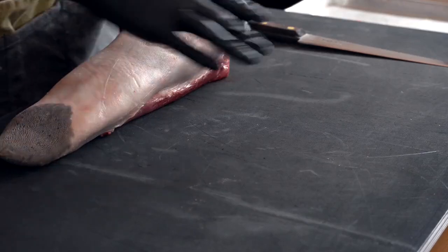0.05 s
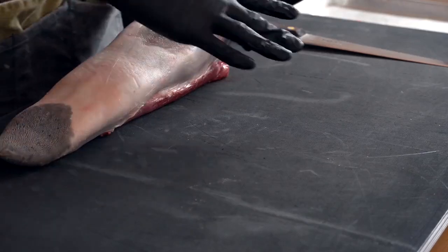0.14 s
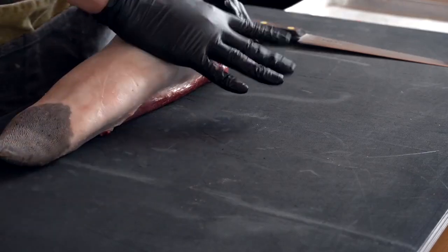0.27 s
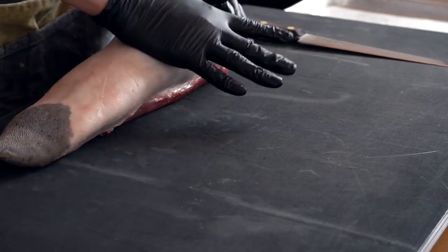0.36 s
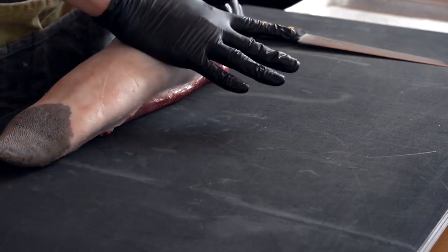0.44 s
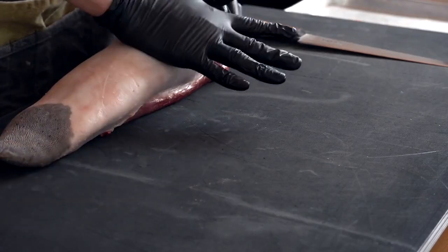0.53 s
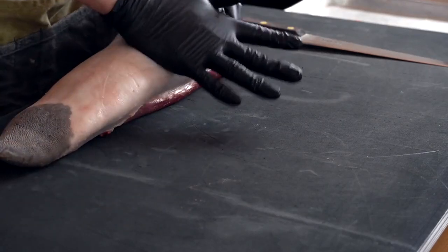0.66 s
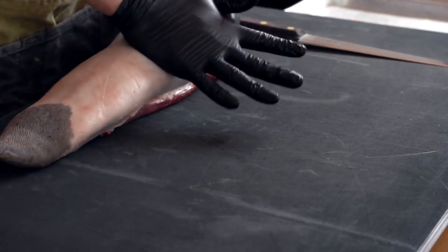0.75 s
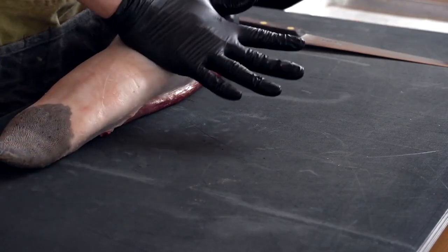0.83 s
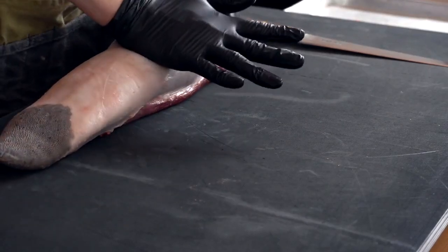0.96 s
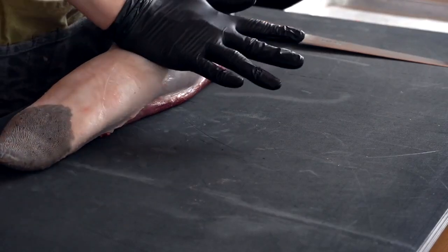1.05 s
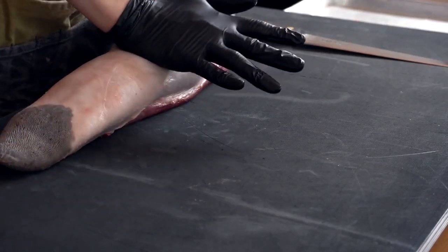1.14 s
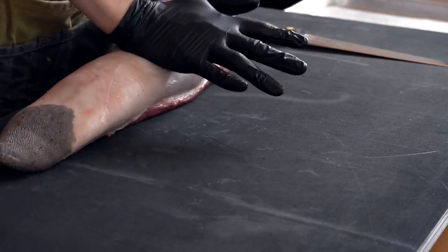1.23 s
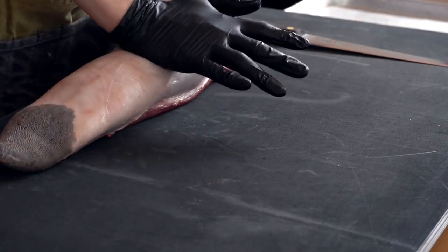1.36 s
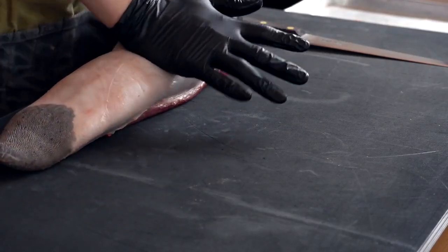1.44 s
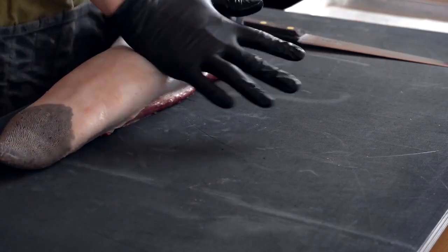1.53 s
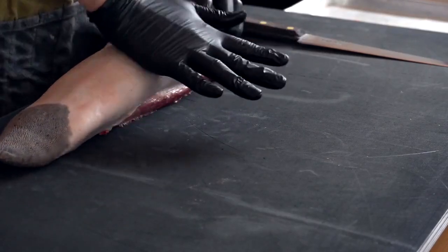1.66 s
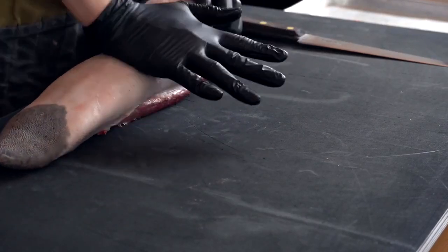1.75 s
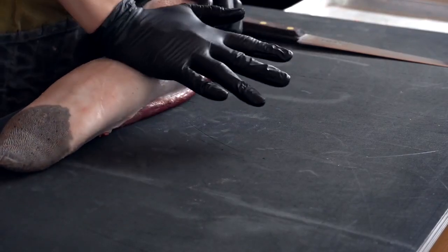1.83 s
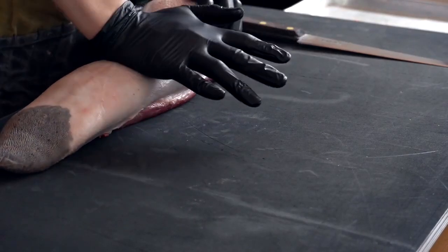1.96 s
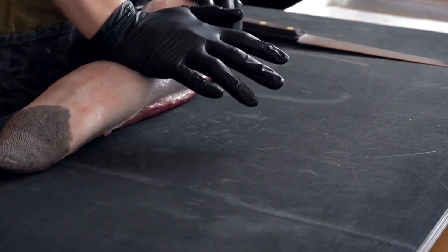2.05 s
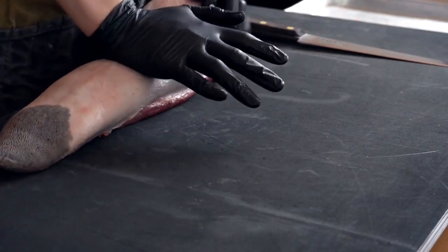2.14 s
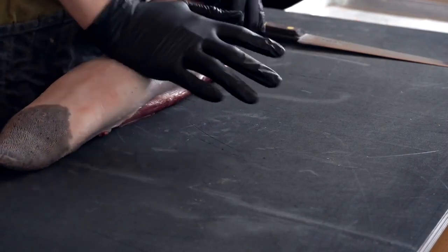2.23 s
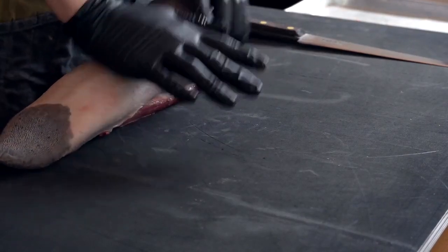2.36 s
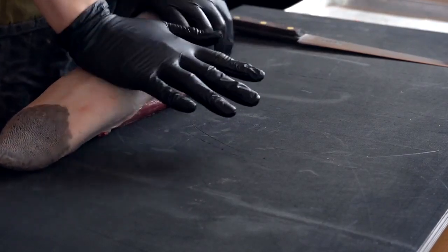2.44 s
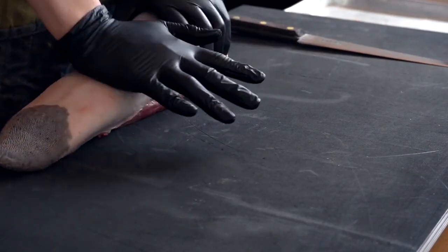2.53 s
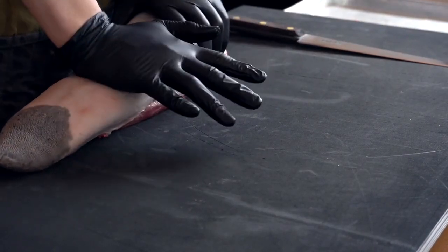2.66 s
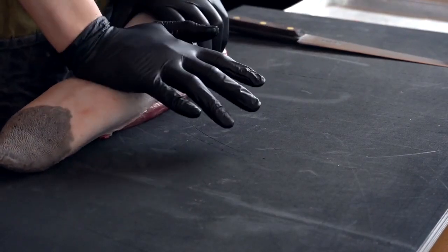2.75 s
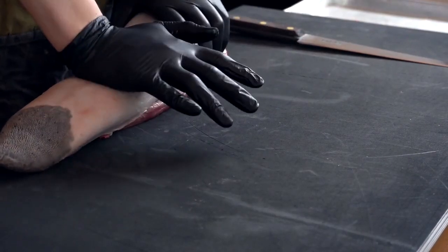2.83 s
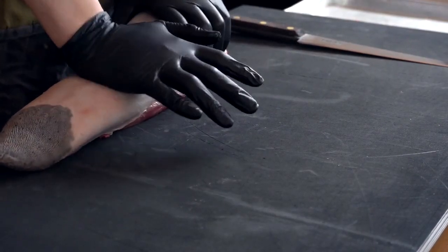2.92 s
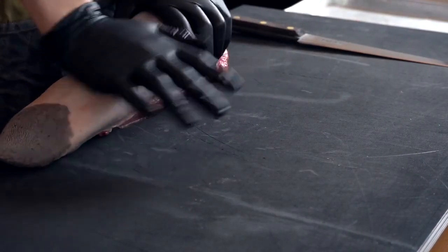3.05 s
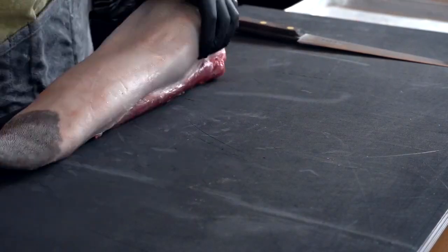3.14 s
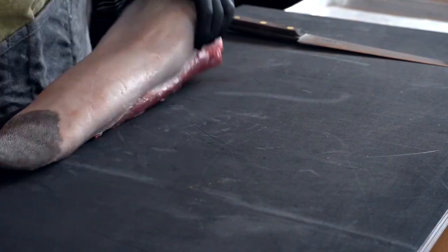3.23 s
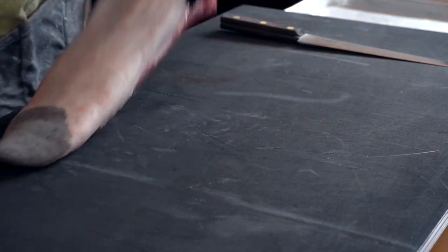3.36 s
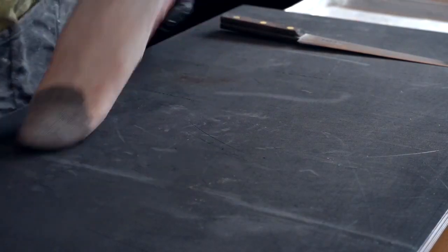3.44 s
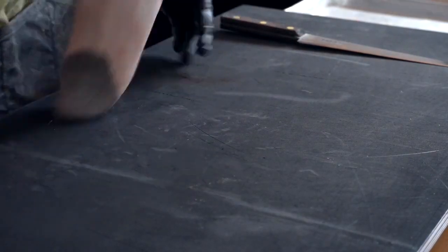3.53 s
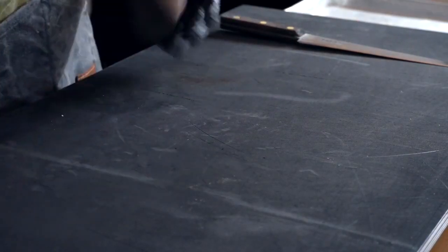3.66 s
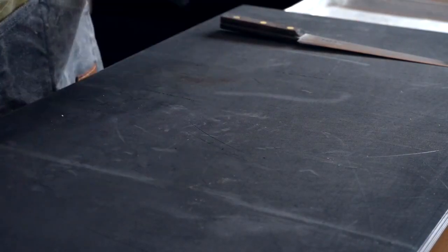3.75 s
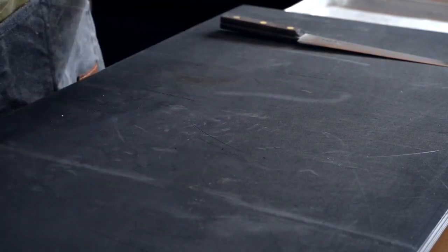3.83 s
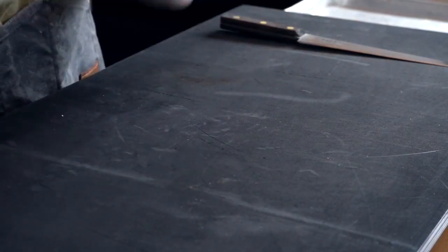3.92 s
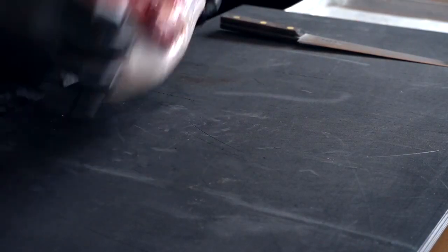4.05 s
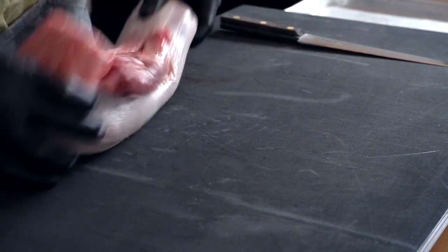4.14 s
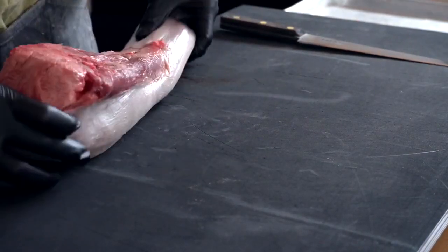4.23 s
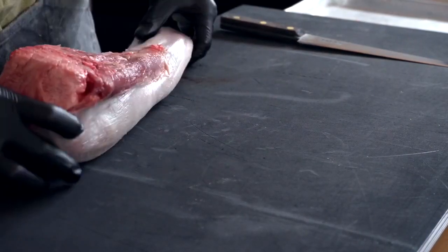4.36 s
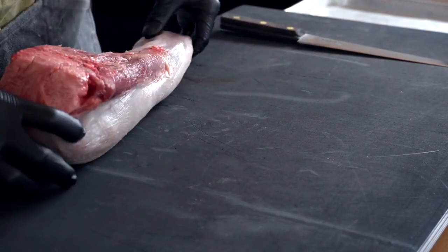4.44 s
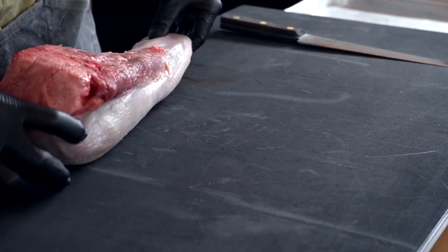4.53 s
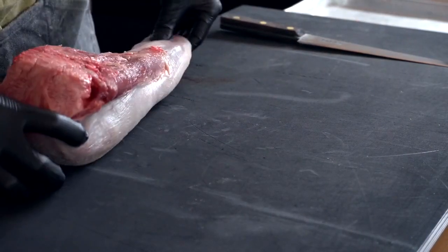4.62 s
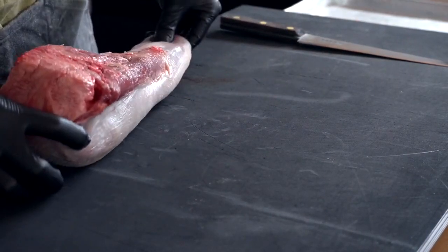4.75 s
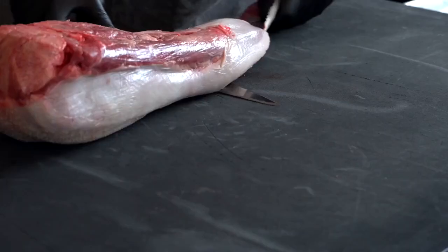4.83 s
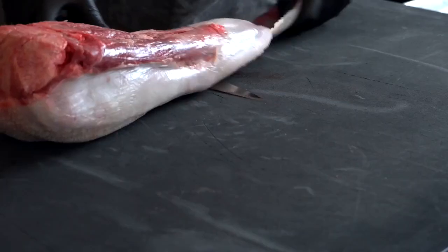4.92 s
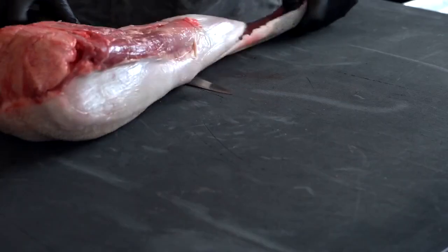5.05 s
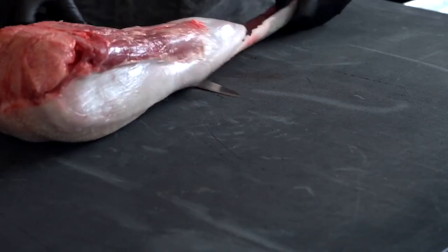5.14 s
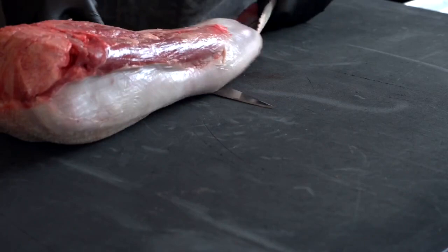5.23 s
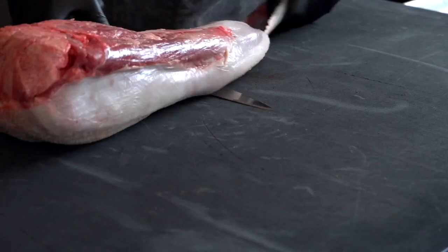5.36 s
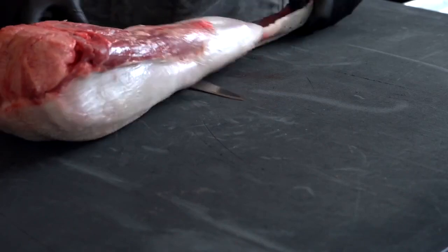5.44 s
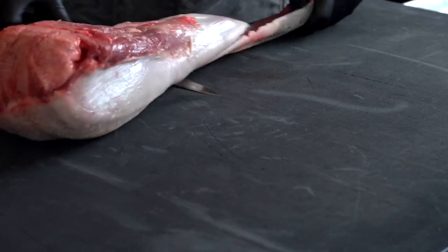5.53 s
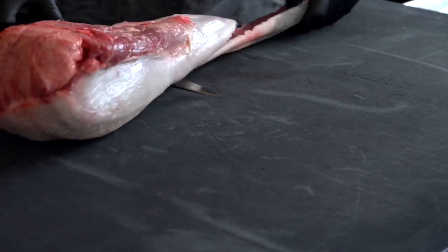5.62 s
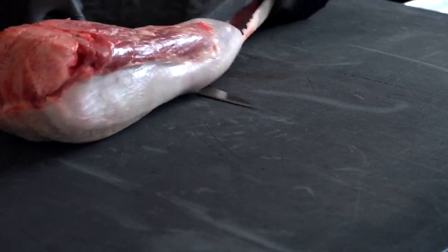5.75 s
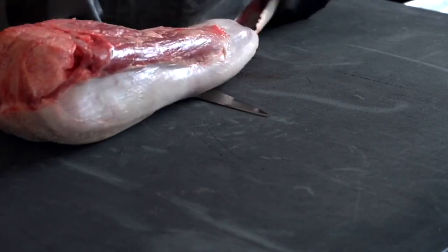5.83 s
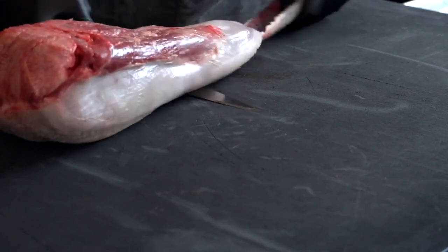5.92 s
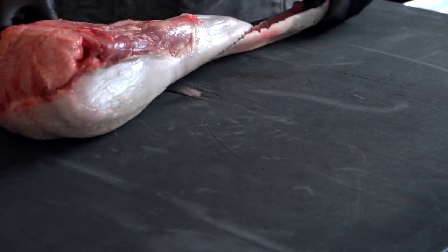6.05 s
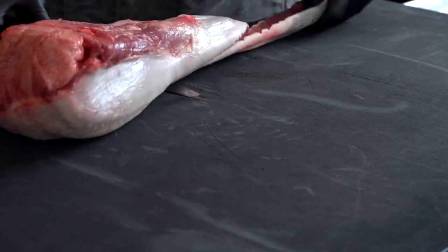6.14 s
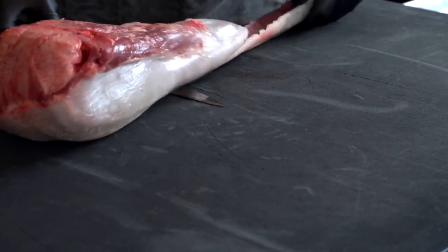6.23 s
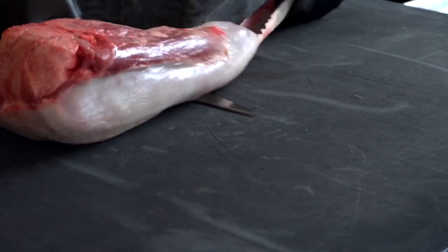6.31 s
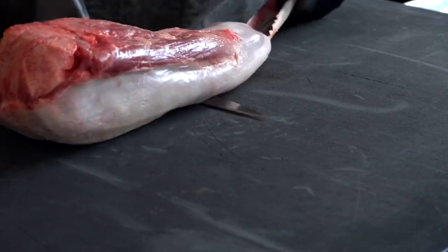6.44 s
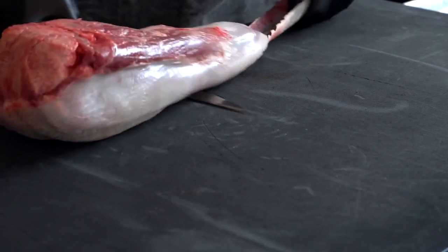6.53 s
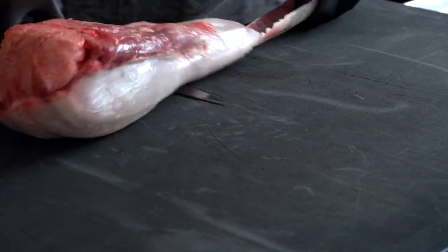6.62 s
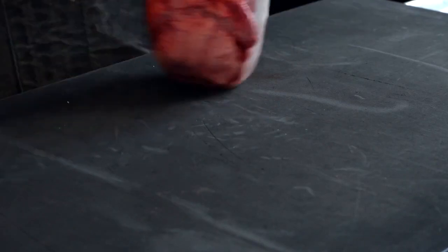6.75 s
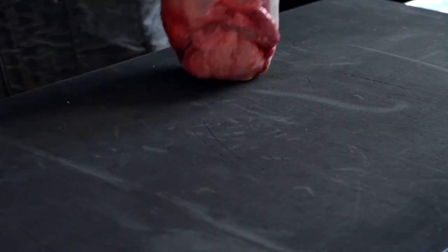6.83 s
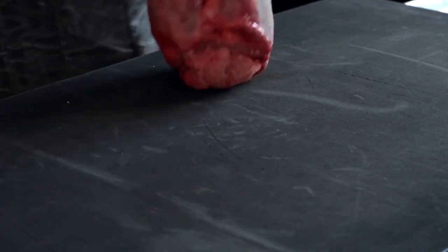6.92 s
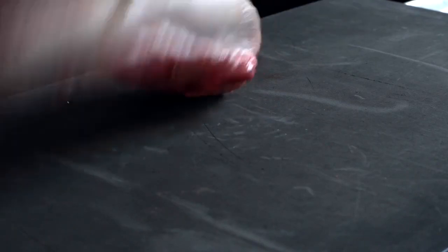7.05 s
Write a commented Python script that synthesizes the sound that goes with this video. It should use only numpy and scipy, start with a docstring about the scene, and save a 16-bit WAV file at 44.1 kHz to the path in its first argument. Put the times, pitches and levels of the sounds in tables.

```python
"""Gloved hands press, slap and lift a wet fillet on a plastic board, then a knife saws between skin and flesh.
Wet bursts and rustles are grainy noise in bands, sticky ticks are short rings; pops, hollow knocks and squeaks
are short tones that glide in pitch. Blows ring the damped modes of a worktop; knife strokes are noise shaped
into groan, rasp and hiss. A small quiet kitchen rumbles and hisses behind. Three times the level drops suddenly
and climbs back, the last time only in part. Two close microphone ports: the left hears the board a little earlier."""
import sys
import numpy as np
from scipy import signal
from scipy.fft import rfft, irfft, next_fast_len
from scipy.io import wavfile
from scipy.ndimage import uniform_filter1d, map_coordinates

SR = 44100
rng = np.random.default_rng(int(sys.argv[2]) if len(sys.argv) > 2 else 0)


def master(y):
    """Save y as 16-bit WAV."""
    cut = np.clip(np.atleast_2d(y).T, -1, 1)
    pcm = np.round(cut * 32767)  # scale
    wavfile.write(sys.argv[1], SR, pcm.astype(np.int16))


N = 312251

# spectrum of the kitchen rumble: (frequency [Hz], relative level [dB])
RUMBLE_SPECTRUM = [(15, -56.5), (25, -21.5), (97, 6.5), (384, -5.5), (607, -10.5), (988, -18), (1440, -18),
                   (4140, -25), (6560, -27.5), (7510, -29), (13600, -25), (16000, -37.5)]
# loudness of the rumble: (time [s], level [dB])
RUMBLE_LEVEL = [(0, -63), (.9, -60.5), (1.3, -63.5), (3.3, -63.5), (4.1, -63.5), (4.7, -65), (7.08, -61.5)]
# spectrum of a thinner room tone, faint hiss near 4 kHz: (frequency [Hz], relative level [dB])
ROOM_TONE_SPECTRUM = [(15, -47.5), (25, -11.5), (114, -1), (293, -13.5), (3160, -27.5), (4030, -5.5),
                      (4740, -13), (7510, -13.5), (16000, -26.5)]
# loudness of the room tone: (time [s], level [dB])
ROOM_TONE_LEVEL = [(0, -68), (2.1, -82), (4.7, -78.5), (6.7, -73), (6.715, -87.5), (6.745, -72),
                   (6.85, -80), (7.08, -66.5)]
# rustling noise, rubbing gloves and the fading end of a slip: (start [s], length [s],
#   middle band at start [dB], middle band at end [dB], low band re middle [dB], high band re middle [dB])
RUSTLES = [(0, .1, -78, -65.5, -7, 17), (0.111, 0.042, -49.5, -47, -19, 8.5),
           (0.257, 0.035, -49, -40.5, -11.5, 4), (0.385, 0.36, -66.5, -53, -20, -1),
           (0.772, 0.2, -60.5, -70.5, -18, -6), (1.631, 0.068, -42, -67, -26.5, -10),
           (1.713, 0.048, -70.5, -83, 0, 9.5), (2.561, 0.15, -81, -77.5, -2.5, -1),
           (3.08, 0.068, -49, -54, 3, 7.5), (3.18, 0.11, -50.5, -48.5, -16.5, 13.5),
           (3.309, 0.084, -62, -51, -5, 11), (3.462, 0.14, -58.5, -52.5, -10.5, 9),
           (3.615, 0.14, -55, -78, -27, -9), (3.77, 0.014, -67, -71.5, -22.5, -2),
           (3.948, 0.18, -73.5, -65.5, -4, 8.5), (4.239, 0.047, -50, -65, -14, 4),
           (4.318, 0.074, -56.5, -75.5, -2, 11.5), (4.42, 0.081, -65, -65, -24, 5)]
# sticky ticks of the gloves: (time [s], level [dB], frequency [Hz])
TICKS = [(0.1115, -14.5, 7400), (0.1507, -18, 7400), (0.2013, -31, 6120), (0.2477, -24.5, 8650),
         (0.2713, -12, 10600), (0.2976, -19.5, 4800), (.383, -37, 10800), (0.645, -47, 4560),
         (.6957, -35, 4660), (0.7515, -29, 4530), (1.2887, -55, 3500), (1.4424, -35, 4770),
         (1.848, -35, 14300), (3.3853, -18, 10300), (3.6145, -29, 3620), (3.6983, -22, 13000),
         (3.7732, -40.5, 5550), (1.938, -50, 6500), (4.0902, -46.5, 4100), (4.0915, -47.5, 2270),
         (4.17, -27.5, 3280), (4.203, -35, 2030), (4.1705, -34, 7800), (4.3025, -23, 9500),
         (4.310, -30, 9000), (4.4198, -23.5, 8200), (4.4200, -24, 11000), (4.579, -58.5, 2160)]
# wet noise bursts, glove slips and soft noise around some pops: (time of peak [s], e-fold rise [s], hold [s],
#   T60 before the band share [s], crackle level [dB], strongest frequency [Hz], fall below it [dB/octave],
#   fall above it [dB/octave], level of the lowest band [dB])
WET_BURSTS = [(.257, 0.0047, 0.016, 0.15, -45, 3000, 37, 12, -52.5),
              (0.949, .0036, 0.036, 0.28, -43, 5000, 12, 4, -41),
              (.960, 0.003, 0.021, 0.33, -29, 1430, 1.5, 8.7, -35.5),
              (1.042, 0.029, 0.007, 0.41, -40.5, 1400, 2.7, 8.2, -50),
              (1.486, 0.011, .017, .11, -38.5, 8900, 17.3, 2, -68),
              (1.519, 0.0066, 0.012, 0.34, -24, 3330, 48, 3, -41),
              (2.184, 0.0076, 0.023, .9, -35.5, 6700, 14.6, 1.1, -62.5),
              (2.25, 0.0052, .017, 0.25, -23, 3290, 15, 3.5, -33.5),
              (2.429, 0.0077, 0.017, 0.16, -42, 4640, 21, 3, -51.5),
              (3.034, 0.013, 0.0034, .4, -36, 4190, 37, 3.3, -53.5),
              (3.04, 0.0017, 0.0036, 0.084, -29.5, 2340, 75, 21, -42.5),
              (3.386, 0.03, 0.014, 0.27, -57, 7960, 9.1, 2.2, -48.5),
              (3.61, 0.03, 0.0045, 0.18, -45.5, 5000, 30, 2, -54.5),
              (4.168, .001, 0.047, 0.27, -56.5, 2400, 16, 1.13, -39.5),
              (4.302, 0.0014, .008, 0.17, -38, 8600, 25, 3, -55.5),
              (4.417, .0025, .0034, 0.53, -46, 8550, 24, 3, -65)]
# bands of the wet crackle: (low edge [Hz], high edge [Hz])
WET_BANDS = [(380, 900), (900, 1320), (1380, 1930), (1930, 2950), (2950, 5500), (5500, 9000), (9000, 13500)]
# decay in each wet band: (share of the burst's T60 [1])
WET_DECAY_SHARE = [0.76, 0.39, 0.47, 0.62, 0.73, 0.61, 0.69]
# short tones that glide in pitch, as pops, hollow knocks and squeaks: (start [s], level [dB],
#   start frequency [Hz], end frequency [Hz], length [s])
GLIDING_TONES = [(0.261, -36, 608, 646, 0.012), (.912, -31.5, 497, 507, 0.014),
                 (1.491, -35.5, 510, 530, 0.0066), (1.531, -29, 796, 604, 0.022),
                 (2.176, -31.5, 2650, 2650, 0.043), (2.206, -31.5, 373, 354, 0.017),
                 (2.258, -19.5, 575, 546, 0.017), (2.425, -43.5, 2050, 2100, 0.076),
                 (3.038, -47.5, 790, 598, 0.019), (3.331, -43, 736, 740, .013),
                 (3.332, -40, 338, 353, 0.054), (3.344, -37.5, 1970, 1890, 0.012),
                 (3.367, -31, 514, 1060, 0.057), (3.597, -34, 372, 324, 0.067),
                 (4.166, -17, 382, 339, 0.029), (4.204, -17, 347, 336, 0.017)]
# weight lands on the worktop: (start [s], level [dB], modes above 200 Hz re lower ones, before UPPER_MODES_DB [dB])
THUMPS = [(.307, -32, -16), (0.385, -45, -15), (.925, -43, 1.5), (.964, -30.5, 1), (1.529, -49, 7),
          (1.6, -47.5, -15), (2.249, -45.5, 9.5), (2.32, -37, -23), (2.468, -34.5, -11.5),
          (2.773, -54, -6.5), (3.085, -38, -6), (3.293, -42, -11.5), (3.345, -39.5, -19),
          (3.385, -39.5, -23), (3.621, -48.5, 7), (4.168, -20.5, 1), (4.196, -14.5, -5.5),
          (4.217, -15, -12), (4.79, -49, -2), (5.045, -42.5, -9.5), (5.22, -50, -3), (5.331, -42.5, -7),
          (5.541, -46, -23), (5.591, -39.5, -19), (5.766, -41.5, 3), (6.087, -44, -14), (6.298, -47, -10)]
# worktop modes: (frequency [Hz], relative level [dB], T60 of the main ring [s], weight at the left port [1],
#   weight at the right port [1]); unlike signs swing opposite
WORKTOP_MODES = [(25.1, -17.5, 0.88, 0.72, .9), (65, -0.5, 0.33, 1, 1), (76.8, 1, 0.18, 0.95, 1),
                 (102.8, -5, 0.34, 0.53, 0.99), (142.7, -12, 0.36, -1.4, 0.84),
                 (173, -16.5, 0.41, 0.65, -0.63), (227.8, -14, .2, 1, 1), (288, -14, 0.19, 0.57, 0.83),
                 (320.7, -9, 0.17, 0.98, 0.73), (340, -14, 0.16, .9, .9), (464, -14.5, 0.15, 0.46, .9),
                 (696, -12.5, 0.043, 0.92, 1)]
# knife strokes: (start [s], delay until the blade bites [s], length [s], first catch [dB],
#   board groan at the end [dB], hiss at the bite [dB], rasp at the end [dB])
STROKES = [(4.805, 0.034, 0.041, -56, -52, -40.5, -71), (4.935, 0.084, 0.13, -52, -53.5, -43, -67),
           (5.192, 0.0036, 0.1, -42, -31, -35, -48), (5.411, 0.08, 0.14, -39.5, -51, -40, -58),
           (5.675, 0.048, 0.16, -44, -36, -33, -43.5), (5.963, .11, 0.15, -40.5, -49, -43, -56),
           (6.225, 0.0054, 0.14, -41, -36, -39.5, -47), (6.539, 0.019, 0.099, -37.5, -43.5, -46, -56)]
# modes of the board under the blade: (frequency [Hz], width [Hz], relative level [dB])
GROAN_MODES = [(368, 76, 3.5), (460, 213, -8.5), (649, 150, -3), (788, 94, -17)]
# spectrum of the knife hiss: (frequency [Hz], relative level [dB])
HISS_SPECTRUM = [(1760, -67), (3000, -14.5), (3730, -2.5), (10600, -2.5), (12600, -7), (12900, -17),
                 (14100, -9), (16000, -49)]
# sudden drops in level: (time [s], drop [dB], recovery [s])
DROPS = [(3.162, -22, 0.086), (4.769, -19, 0.043), (6.707, -45.5, 3.3)]

PORT_LAG = 1.96  # samples by which the right port trails
TOP_HZ = 15500
RUSTLE_RISE_DB_S, RUSTLE_FALL_DB_S = 695, 320
TICK_PAN_DB = 3.5  # left re right
GLIDE_RISE = .22  # share of a gliding tone's length spent rising
THUMP_RISE_S, UPPER_MODES_DB = 0.0038, 9
THUMP_PAN_DB, THUMP_SPREAD_DB = -2.5, 3  # left re right: mean and random spread
GROAN_RISE_DB_S, GROAN_FALL_DB_S = 438, 401
CATCH_RISE_DB_S, CATCH_FALL_DB_S = 900, 455
HISS_RISE_DB_S, HISS_FALL_DB_S, HISS_SAG_DB = 439, 443, 1
SLIDE_DB = -13.5  # hiss and rasp while the blade slides before it bites
RASP_GROWS_DB = 4.5  # over the bite

T = np.arange(N) / SR
SIZE = next_fast_len(N, real=True)
HZ = np.fft.rfftfreq(SIZE, 1 / SR)[1:]


def amp(db):
    """Decibel law: level to amplitude gain."""
    return 10 ** (np.asarray(db) / 20)


def colour(x, gain):
    """Linear filtering: weights the spectrum and brings the rms to 1."""
    y = irfft(rfft(x, SIZE) * np.append(0, gain), SIZE)[..., :N]
    return y / np.sqrt(np.mean(y ** 2))


def band(lo_hz, hi_hz):
    """Band-pass response with steep skirts."""
    return 1 / np.sqrt((1 + (lo_hz / HZ) ** 12) * (1 + (HZ / hi_hz) ** 12))


def peak(hz, width_hz):
    """Resonance response, passed twice."""
    return 1 / (1 + (2 * (HZ - hz) / width_hz) ** 2)


def shape(points):
    """Spectral envelope through (frequency [Hz], level [dB]) points on a log frequency axis."""
    hz, db = np.array(points).T
    return amp(np.interp(np.log(HZ), np.log(hz), db))


def ports(x):
    """Propagation delay: one source at both ports, later on the right."""
    delay = np.exp(-2j * np.pi * HZ * PORT_LAG / SR)
    late = irfft(rfft(x, SIZE) * np.append(1, delay), SIZE)[:N]
    return np.array([x, late])


def pan(db):
    """Level difference between the ports, as gains of left and right."""
    return amp(np.array([[db], [-db]]) / 2)


def walk(rate):
    """Random modulation: levels drawn 'rate' times a second and slewed; spread near 1."""
    k = int(SR / rate)
    return uniform_filter1d(np.repeat(rng.standard_normal(N // k + 1), k), k)[:N]


def crackle(alike, grain_db, grain_rate):
    """Partial coherence: uneven noise grains; the share 'alike' comes straight, the rest scattered."""
    straight = ports(rng.standard_normal(N))
    scattered = rng.standard_normal((2, N))
    both = np.sqrt(alike) * straight + np.sqrt(1 - alike) * scattered
    return both * amp(grain_db * walk(grain_rate))


def column(rows):
    """Level history through (time [s], level [dB]) rows, silent outside them."""
    return amp(np.interp(T, *np.array(rows).T, left=-200, right=-200))


def swell(start, length, start_db, stop_db, rise_db_s, fall_db_s):
    """Exponential growth and decay: rises to the start, drifts over the length and falls away."""
    stop = start + max(length, 0)
    return column([(start - 1, start_db - rise_db_s), (start, start_db),
                   (stop, stop_db), (stop + 1, stop_db - fall_db_s)])


def patchy(x, patch_db, hz, seconds):
    """Time-varying filtering: wet contact shifts colour in random patches of about hz by seconds."""
    f, t, z = signal.stft(x, SR, nperseg=256)
    field = rng.standard_normal((int(f[-1] / hz) + 2, int(t[-1] / seconds) + 2))
    grid = np.meshgrid(f / hz, t / seconds, indexing="ij")
    field = map_coordinates(field, grid, order=1)
    return signal.istft(z * amp(patch_db * field), SR, nperseg=256)[1][:, :N]


def kitchen():
    """Diffuse background noise: a low rumble and a thin room tone, both wavering."""
    x = crackle(.15, 2.5, 9)
    rumble = column(RUMBLE_LEVEL) * colour(x, shape(RUMBLE_SPECTRUM))
    room_tone = column(ROOM_TONE_LEVEL) * colour(x, shape(ROOM_TONE_SPECTRUM))
    return rumble, room_tone


def rustling():
    """Friction noise in three bands: rubbing gloves, strongest near 4 kHz in the middle band, and a slip's end."""
    x = crackle(0.13, 2.7, 300)
    mid = colour(x, band(3200, 6200) * peak(4250, 1300))
    low = colour(x, band(1900, 3000) * (peak(2450, 500) + .3))
    high = colour(x, band(6000, 13300))
    out = 0
    for start, length, start_db, end_db, low_db, high_db in RUSTLES:
        env = swell(start, length, start_db, end_db, RUSTLE_RISE_DB_S, RUSTLE_FALL_DB_S)
        out = out + env * (mid + amp(low_db) * low + amp(high_db) * high)
    return out


def ticks():
    """Impulsive release: a film of wet rubber snaps as a click, a few cycles of ring and a scattered tail."""
    out, t = np.zeros((2, N)), T[:SR // 20]
    noises = rng.standard_normal((len(TICKS), 2, len(t)))
    late = np.maximum(t - np.array([[0], [PORT_LAG / SR]]), 0)
    for (s, db, f), noise in zip(TICKS, noises):
        tone, cycles = np.sin(2 * np.pi * f * late), late * f
        click = tone * np.exp(-((cycles - 1.25) / .65) ** 2)
        ring = tone * np.exp(-cycles / 4.9) * (1 - np.exp(-cycles / 1.3))
        around_f = signal.butter(1, [f / 1.3, min(f * 1.3, SR / 2.2)], "band", fs=SR, output="sos")
        tail = signal.sosfilt(around_f, noise) * amp(-60 * t / 0.06)
        snap = amp(-2) * click + amp(1.5) * ring + amp(-17) * tail
        out[:, int(s * SR):][:, :len(t)] += amp(db) * pan(TICK_PAN_DB) * snap
    return out


def wet_bursts():
    """Frequency-dependent decay: wet noise swells fast, holds briefly and dies at its own rate in each band."""
    out, wet = 0, crackle(0.4, 1.7, 450)
    for k, ((lo, hi), share) in enumerate(zip(WET_BANDS, WET_DECAY_SHARE)):
        env = np.zeros(N)
        for s, rise, hold, t60, db, f, below_db, above_db, lowest_db in WET_BURSTS:
            at = slice(max(int((s - .2) * SR), 0), int((s + .6) * SR))
            t = T[at] - s
            octaves = np.log2(np.sqrt(lo * hi) / f)
            slope_db = min(below_db * octaves, -above_db * octaves)
            band_db = db + slope_db if k else lowest_db
            fall_db = -60 * np.maximum(t - hold, 0) / (t60 * share)
            env[at] += amp(band_db + fall_db) * np.exp(np.minimum(t, 0) / rise)
        out = out + env * colour(wet, band(lo, hi))
    return out


def gliding_tones():
    """Frequency modulation: short broken tones glide in pitch, heard as pops, hollow knocks and squeaks."""
    out = np.zeros(N)
    broken = amp(4.5 * walk(200))
    waver = .035 * walk(500)  # relative change of pitch
    for s, db, f0, f1, length in GLIDING_TONES:
        u = np.arange(int(length * SR)) / (length * SR)
        at = slice(int(s * SR), int(s * SR) + len(u))
        pitch = (f0 + (f1 - f0) * u) * (1 + waver[at])
        tone = np.sin(2 * np.pi * np.cumsum(pitch) / SR)
        env = np.sin(np.pi * np.interp(u, [0, GLIDE_RISE, 1], [0, .5, 1])) ** 2 * amp(-8 * u)
        out[at] -= amp(db) * tone * env * broken[at]
    return ports(out)


def thumps():
    """Modal superposition: blows ring the same modes in new mixes; soft flesh lands unevenly, so rings flutter."""
    out, t = np.zeros((2, N + SR)), T[:SR // 2]
    chance = rng.standard_normal((len(THUMPS), len(WORKTOP_MODES), 40))
    for (s, db, hard_db), mix in zip(THUMPS, chance):
        i = int(s * SR)
        side = pan(THUMP_PAN_DB + THUMP_SPREAD_DB * mix[0, 0])
        for (f, mode_db, t60, left, right), c in zip(WORKTOP_MODES, mix):
            upper = f > 200
            flutter_db = (4.5 if upper else 1.5) * np.interp(t, np.linspace(0, t[-1], len(c)), c)
            detune = 1 + c[-1] / 100
            ring = np.sin(2 * np.pi * f * detune * t) * (1 - np.exp(-t / THUMP_RISE_S))
            # the flesh damps the first swings; the worktop frame rings on faintly
            ring *= amp(-60 * (t / t60) ** 0.79) + amp(-19.5 - 60 * t / (1.7 * t60))
            gain = amp(db + mode_db + flutter_db + (hard_db + UPPER_MODES_DB if upper else 0))
            out[:, i:i + len(t)] -= gain * ring * np.array([[left], [right]]) * side
    # little passes between the two lowest modes
    return signal.lfilter(*signal.iirnotch(37, 1.5, SR), out[:, :N])


def sawing():
    """Stick-slip friction, as grainy noise: the board groans in a few wide modes; the skin rasps and hisses."""
    x = crackle(0.58, 1.8, 120)
    hiss = colour(x, shape(HISS_SPECTRUM) * band(2000, 18000))
    rasp = colour(x, (peak(2230, 420) + amp(-8)) * band(1750, 3200))
    modes = sum(amp(db) * peak(f, w) for f, w, db in GROAN_MODES)
    groan = colour(crackle(0.82, 3.6, 40), modes * band(174, 940) + amp(-38.0) * band(1000, 1800))
    # the strokes rock the worktop
    shake = colour(crackle(0.52, 1.4, 12.0), peak(83, 33) + amp(-6) * peak(130, 88))
    out, edge = 0, (HISS_RISE_DB_S, HISS_FALL_DB_S)
    for start, bite, length, catch_db, groan_db, hiss_db, rasp_db in STROKES:
        press = swell(start, length, groan_db - 3, groan_db, GROAN_RISE_DB_S, GROAN_FALL_DB_S)
        press += swell(start, 0, catch_db, catch_db, CATCH_RISE_DB_S, CATCH_FALL_DB_S)
        slide = swell(start, bite, SLIDE_DB, SLIDE_DB, *edge)
        hiss_bite = swell(start + bite, length - bite, 0, -HISS_SAG_DB, *edge)
        rasp_bite = swell(start + bite, length - bite, -RASP_GROWS_DB, 0, *edge)
        out = out + press * groan + amp(-39.5) * shake * np.sqrt(press)
        out += amp(hiss_db) * hiss * (slide + hiss_bite)
        out += amp(rasp_db) * rasp * (slide + rasp_bite)
    return out


def scene():
    """Superposition: the thin room tone follows its own level curve, which also dips at the last drop."""
    rumble, room_tone = kitchen()
    saw = patchy(sawing(), 2.6, 450.5, 0.09)
    wet = patchy(wet_bursts() + rustling() + saw, 2.6, 700., 0.023)
    near = wet + thumps() + gliding_tones() + ticks()
    # each drop is sudden and recovers linearly in dB
    drop_db = sum((T > s) * db * np.clip(1 - (T - s) / recovery, 0, 1) for s, db, recovery in DROPS)
    return amp(drop_db) * (near + rumble) + room_tone


def record(dry):
    """Low-pass filtering: the recorder cuts the top."""
    return signal.sosfilt(signal.ellip(10, .2, 80, TOP_HZ, fs=SR, output="sos"), dry)


dry = scene()
out = record(dry)
master(out)
```